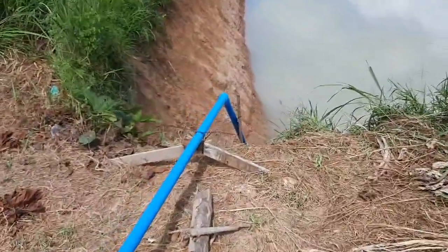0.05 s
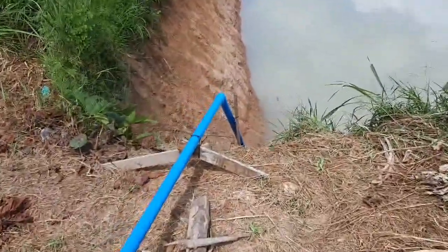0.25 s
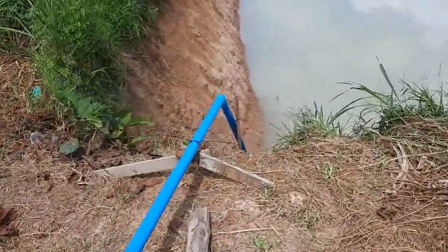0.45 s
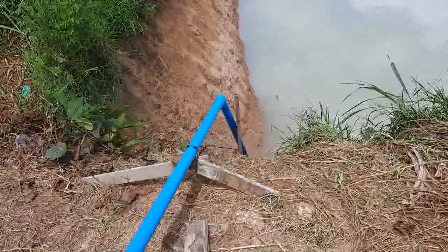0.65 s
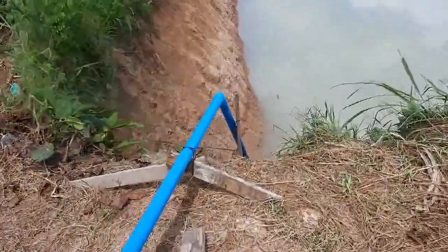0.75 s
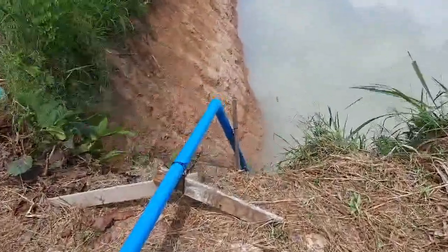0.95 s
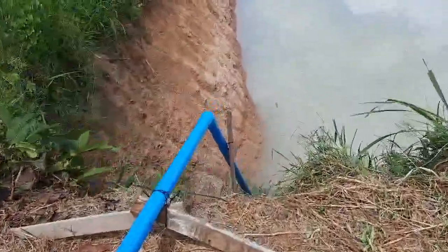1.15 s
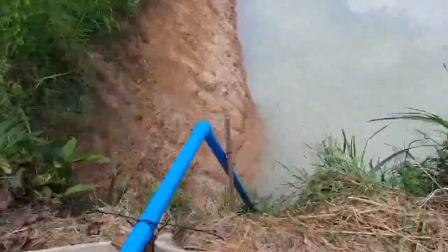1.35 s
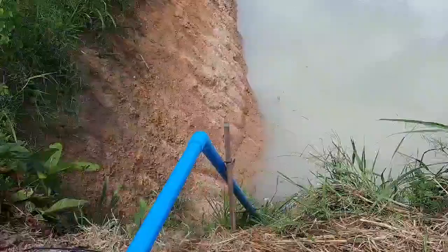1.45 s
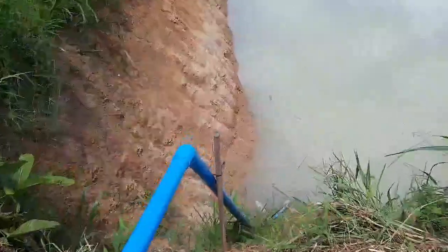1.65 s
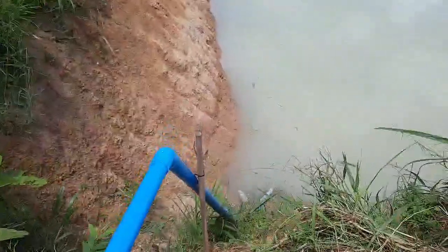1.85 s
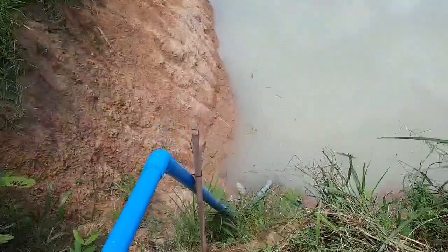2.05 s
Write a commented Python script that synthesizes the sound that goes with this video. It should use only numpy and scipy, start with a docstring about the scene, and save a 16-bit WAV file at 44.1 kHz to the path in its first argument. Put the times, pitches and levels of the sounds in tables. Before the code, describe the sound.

Uneven gusts of wind buffet the microphone outdoors on a pond bank, easing near the end. Underneath, a faint motor whine switches off and coasts down, with light crunching steps and small snaps in dry straw.

```python
"""Wind gusts buffet the two microphone ports of a hand-held camera on a pond bank:
turbulence rumbles at each port and single strong eddies slap it. A small motor whines,
is switched off and coasts down. Feet shift and crunch on dry straw, a few stalks snap,
and an insect pulses faintly in the grass over a low outdoor hiss."""
import sys
import numpy as np
from scipy import signal
from scipy.fft import rfft, irfft, next_fast_len
from scipy.io import wavfile
from scipy.ndimage import uniform_filter1d, map_coordinates

SR = 44100
rng = np.random.default_rng(int(sys.argv[2]) if len(sys.argv) > 2 else 0)


def wrap_up_sound(samples):
    """Save the sound to the file named by the first command line argument, as 16-bit audio."""
    columns = np.atleast_2d(samples).T
    # keep every value between -1 and 1, then stretch to whole-number steps
    tamed = np.clip(columns, -1, 1)
    steps = np.round(tamed * 32767).astype(np.int16)
    wavfile.write(sys.argv[1], SR, steps)


N = 92610

# gust envelope per port: time_s, level_db
LEFT_GUSTS = [(0, -45), (.2, -44), (.279, -40), (.324, -35), (.39, -32.5), (.444, -45), (.574, -39),
              (.644, -41), (.758, -28), (.803, -44), (.888, -33), (.918, -47), (1.018, -39.5), (1.063, -45),
              (1.083, -35), (1.152, -49), (1.25, -45.5), (1.377, -38.5), (1.44, -40.5), (1.485, -34.5),
              (1.6, -25), (1.641, -44.5), (1.716, -33.5), (1.745, -70), (1.79, -50.5), (1.826, -40),
              (1.86, -45.5), (1.911, -45), (1.966, -79), (2.095, -72)]
RIGHT_GUSTS = [(0, -61), (.07, -51.5), (0.113, -35.5), (.15, -40.5), (0.235, -38.5), (0.328, -37.5),
               (0.363, -24), (0.455, -31.5), (.5, -26.5), (.61, -28), (.654, -35.5), (0.791, -30),
               (.823, -24), (.95, -19.5), (0.99, -24.5), (1.04, -19), (1.07, -30), (1.187, -43.5),
               (1.213, -29.5), (1.288, -33), (1.335, -22), (1.39, -27.5), (1.447, -25), (1.497, -27),
               (1.593, -24), (1.63, -41), (1.663, -35), (1.691, -46), (1.78, -52), (1.891, -50.5),
               (2.095, -75)]
# port turbulence: freq_hz, gain_db
BUFFET_SPECTRUM = [(20, -41), (38, -10.5), (60, 0.5), (85, 2), (150, -4), (230, -15), (305, -8.5),
                   (400, -19.5), (550, -33.5), (900, -55.5), (2500, -65.5)]
# small-eddy trim: left_db, right_db
SMALL_EDDY_TRIM = [-3.5, 1.5]
# strong eddies: start_s, level_db, start_pitch_hz, rise_cycles, port (0 left, 1 right)
SLAPS = [(0.231, -25, 84.4, 1.15, 1), (0.35, -20.5, 369, 3.24, 1), (.363, -13.5, 148, 0.61, 1),
         (.379, -12, 133, 0.78, 1), (.478, -15.5, 130, 0.57, 1), (.506, -22, 256, 1.1, 1),
         (.571, -17.5, 100, 1.06, 1), (.6, -18.5, 105, 1, 1), (.812, -17.5, 86, 1.13, 1),
         (.845, -12, 131, 0.9, 1), (.882, -11.5, 100, 0.79, 1), (.920, -7, 117, 0.69, 1),
         (.957, -15, 199, 1.8, 1), (1.012, -19.5, 108, 0.7, 0), (1.028, -19, 279, 2.27, 1),
         (1.082, -22, 90, 0.49, 0), (1.309, -16.5, 176, 0.89, 1), (1.332, -12.5, 203, 2.03, 1),
         (1.483, -12, 126, 0.8, 1), (1.491, -14.5, 120, 0.62, 0), (1.516, -13, 130, 0.56, 0),
         (1.54, -14.5, 220, 1.04, 1), (1.575, -16, 143, 0.77, 0), (1.584, -19, 280, 1.16, 1),
         (1.6056, -6.5, 210, 0.65, 0), (1.648, -23, 129, 1.1, 1), (1.815, -31, 131, 0.96, 0),
         (1.88, -33.5, 84, 1.16, 0)]

# motor tones at full speed: shaft_multiple, level_db
WHINE_ORDERS = [(10, -55.5), (12, -39.5), (20, -61), (24, -69), (25, -59.5)]
HUM_ORDERS = [(4.88, -60.5), (5.44, -64), (8.32, -61)]
# housing ring, air through the motor: freq_hz, gain_db
HOUSING_SPECTRUM = [(1200, -26), (1600, -16), (1740, 2), (1950, -2.5), (2150, -3), (2500, -31)]
AIR_SPECTRUM = [(100, 8), (220, -38), (420, -4.5), (700, 0), (1150, -6), (1500, 2), (2100, 5.5), (2650, -1),
                (3400, 1), (4400, -1.5), (5100, -3.5), (5900, -8.5), (8000, -11.5), (9500, -16.5),
                (12500, -13), (16000, -21.5)]
# air noise arriving straight from the motor: freq_hz, power_share
AIR_DIRECT_SHARE = [(1400, 0.64), (2000, 0.99), (2650, 0.95), (3200, 0.64), (4400, .62), (12000, .32)]
# motor delay between ports: freq_hz, right_lag_ms
MOTOR_LAG = [(700, 0.28), (1500, 0.14), (2000, 0.17), (2600, 0.2), (3800, .24), (8000, 0.248)]
# motor balance: freq_hz, left_minus_right_db
MOTOR_PAN = [(700, 1), (1100, 9), (2000, -3), (2800, 0), (5200, -5.5), (8000, 1)]

# footsteps: start_s, level_db, attack_s, hold_s, t60_s, thud_offset_db
STEPS = [(.03, -51, 0.086, 0.013, 1, -32), (.47, -50, 0.039, 0.024, 2.36, 3.5),
         (.73, -49, 0.067, 0, .5, -3.5), (0.808, -42, 0.0033, 0.0024, 0.42, 4),
         (0.913, -58.5, 0.056, .01, 0.53, 8.5), (1.089, -48.5, 0.002, 0.0095, 0.38, -1),
         (1.241, -42, 0.025, 0.014, 0.3351, 2), (1.422, -61.5, .005, 0.19, 0.05, 6.5),
         (1.659, -54.5, 0.016, 0.057, 0.33, -7), (1.789, -64, 0.02, 0.062, 0.4, -14)]
# crushed straw, scuffed soil: freq_hz, gain_db
STRAW_SPECTRUM = [(300, -36), (1200, -4.5), (2300, 5), (3500, -2), (5500, -0.5), (7000, 1), (9000, -3.5),
                  (10500, -4.5), (12000, 1.5), (14500, 0), (16000, -0.5)]
SOIL_SPECTRUM = [(150, -7), (400, 4.5), (700, 0), (1300, -7), (2500, -12.5), (6000, -37)]
# breaking stalks: start_s, level_db, ring_hz, ring_offset_db
SNAPS = [(0.809, -34, 2400, -22), (.814, -44.5, 738, 6), (0.9684, -51.5, 1500, 11.5),
         (1.091, -39.5, 2700, -7), (1.1821, -41.5, 5000, -37), (1.264, -49, 2200, -10),
         (1.359, -54.5, 2800, 6.5), (1.4302, -40, 9000, -12.5), (1.807, -61, 2315, 6),
         (2.049, -63, 2400, 2.5)]
# insect rasp, outdoor hiss: freq_hz, gain_db
RASP_SPECTRUM = [(6800, -34), (7400, -5), (7750, -1), (8200, -43)]
FIELD_SPECTRUM = [(60, 16), (180, -10), (320, -3), (600, 2), (1300, -27), (2300, 6.5), (3500, -2),
                  (7000, 2), (8500, -6), (14000, -6), (16000, -28)]


def amp(db):
    return 10 ** (np.asarray(db) / 20)


def unit_rms(x):
    return x / np.sqrt(np.mean(x ** 2) + 1e-20)


def time_s():
    return np.arange(N) / SR


def lookup(table, hz):
    """Interpolate (freq_hz, value) rows on a log frequency axis."""
    freq_hz, value = np.transpose(table)
    return np.interp(np.log(hz + 1), np.log(freq_hz + 1), value)


def filtered(x, response):
    """Apply a complex frequency response."""
    size = next_fast_len(N + SR // 2)
    return irfft(rfft(x, size) * response(np.fft.rfftfreq(size, 1 / SR)), size)[..., :N]


def coloured(x, spectrum):
    """Shape x by a spectrum; rms 1."""
    return unit_rms(filtered(x, lambda hz: amp(lookup(spectrum, hz))))


def noise(spectrum, coherence=0):
    """Shaped stereo noise; rms 1."""
    white = rng.standard_normal((3, N))
    return coloured(np.sqrt(1 - coherence) * white[:2] + np.sqrt(coherence) * white[2], spectrum)


def wobble(rate_hz):
    """Smooth random curve through Gaussian knots."""
    knots = rng.standard_normal(int(N * rate_hz / SR) + 4)
    return map_coordinates(knots, [np.arange(N) * rate_hz / SR])


def burst(start_s, attack_s, t60_s, hold_s=0):
    """Linear rise, hold, exponential decay."""
    age_s = time_s() - start_s
    return np.clip(age_s / attack_s, 0, 1) * amp(-60 * np.maximum(age_s - attack_s - hold_s, 0) / t60_s)


def wind_buffet(split_hz=197, strong_gust_db=-27.5, eddy_db_per_db=0.31, flap_hz=38, flutter_hz=90):
    """Each port has its own turbulence; stronger gusts shed more small, higher-pitched eddies."""
    gust_db = np.array([np.interp(time_s(), *np.transpose(port)) for port in (LEFT_GUSTS, RIGHT_GUSTS)])
    swirl = noise(BUFFET_SPECTRUM)
    swirl /= np.sqrt(np.abs(uniform_filter1d(swirl ** 2, size=1300)) + 0.02)  # flatten the envelope
    large_eddies = filtered(swirl, lambda hz: 1 / (1 + (hz / split_hz) ** 6))
    # flap: the flow catches and leaves each port
    flap, flutter = (np.array([wobble(hz), wobble(hz)]) for hz in (flap_hz, flutter_hz))
    flap -= uniform_filter1d(flap, size=1800)
    flap, flutter = (1.35 * np.tanh(swing / 1.35) for swing in (flap, flutter))  # soft limit
    trim_db = np.array(SMALL_EDDY_TRIM)[:, None]
    small_db = eddy_db_per_db * (gust_db - strong_gust_db) + 2.96 * flutter + trim_db
    small_eddies = (swirl - large_eddies) * amp(small_db)
    return amp(gust_db + 2.5 * flap) * (large_eddies + small_eddies)


def eddy_slaps(half_pitch_rises=3.94):
    """A strong eddy hits one port: a sudden pressure swing that slows as it dies."""
    ports = np.zeros((2, N))
    for start_s, level_db, pitch_hz, rise_cycles, port in SLAPS:
        age_rises = np.maximum(time_s() - start_s, 0) * pitch_hz / rise_cycles
        cycles = rise_cycles * half_pitch_rises * np.log1p(age_rises / half_pitch_rises)
        envelope = (age_rises * np.exp(1 - age_rises)) ** 2
        ports[port] += amp(level_db) * envelope * np.sin(2 * np.pi * cycles)
    return ports


def shaft_tones(orders, turns):
    """Tones at multiples of the shaft rate, each flickering in level."""
    return sum(amp(level_db + wobble(45.1)) * np.sqrt(2) * np.sin(2 * np.pi * multiple * turns)
               for multiple, level_db in orders)


def motor(whine_hz=2087, blades=12, off_s=0.305, coast_per_s=0.63, fade_s=0.27):
    """Tones sink after switch-off; whine and housing ring fade first, then hum and rushing air."""
    coast_s = np.maximum(time_s() - off_s, 0)
    slowing = coast_per_s * coast_s  # loss of log speed
    shaft_hz = whine_hz / blades * np.exp(-slowing) * (1 + 0.0025 * wobble(58.8))
    turns = np.cumsum(shaft_hz) / SR
    fade = 1 - np.exp(-(coast_s / fade_s) ** 4)
    tones = shaft_tones(WHINE_ORDERS, turns)
    housing = amp(-46.5) * noise(HOUSING_SPECTRUM)[0]
    whine = amp(-25.5 * slowing - 19 * fade) * (tones + housing)
    hum = amp(-33 * slowing) * shaft_tones(HUM_ORDERS, turns)
    air_gain = amp(-42.5 - 26.5 * slowing + 0.79 * wobble(39.24))
    direct_air = filtered(noise(AIR_SPECTRUM)[0], lambda hz: np.sqrt(lookup(AIR_DIRECT_SHARE, hz)))
    diffuse_air = filtered(noise(AIR_SPECTRUM), lambda hz: np.sqrt(1 - lookup(AIR_DIRECT_SHARE, hz)))
    return motor_at_ports(whine + hum + air_gain * direct_air, air_gain * diffuse_air)


def motor_at_ports(direct, diffuse):
    """Direct sound reaches the right port later; the balance varies with frequency."""
    side = np.array([[0.5], [-0.5]])
    arrived = filtered(direct, lambda hz: np.exp(2j * np.pi * hz * side * lookup(MOTOR_LAG, hz) / 1000))
    return filtered(arrived + diffuse, lambda hz: amp(side * lookup(MOTOR_PAN, hz)))


def footsteps(cracks_per_s=900, crack_spread_db=3.5, crackle_db=-6, soil_db=-3.5):
    """Each step crushes straw into a rustle of tiny cracks and scuffs the soil below."""
    crush, press = np.zeros((2, N))
    for start_s, level_db, attack_s, hold_s, t60_s, thud_offset_db in STEPS:
        envelope = amp(level_db) * burst(start_s, attack_s, t60_s, hold_s)
        crush += envelope
        press += amp(thud_offset_db) * envelope
    sizes = amp(crack_spread_db * np.minimum(rng.exponential(size=N), 4))
    cracks = (rng.random(N) < cracks_per_s / SR) * sizes * rng.standard_normal((2, N))
    rustle = noise(STRAW_SPECTRUM, coherence=0.14)
    straw = unit_rms(rustle + amp(crackle_db) * coloured(cracks, STRAW_SPECTRUM))
    return crush * straw + amp(soil_db) * press * noise(SOIL_SPECTRUM, coherence=0.75)


def stalk_snaps():
    """Dry stalks break: a crack and a very short ring."""
    crack_envelope, ring = np.zeros((2, N))
    for start_s, level_db, ring_hz, ring_offset_db in SNAPS:
        crack_envelope += amp(level_db) * burst(start_s, attack_s=0.00071, t60_s=0.0077)
        tone = np.sin(2 * np.pi * ring_hz * time_s() + wobble(700))
        ring += amp(level_db + ring_offset_db) * burst(start_s, attack_s=0.00063, t60_s=0.027) * tone
    return crack_envelope * noise(STRAW_SPECTRUM, coherence=0.21) + ring


def insect(pulses_per_s=33, pulse_s=0.021, top_hz=7950, drop_hz=449, level_db=-68, rasp_offset_db=-8.5):
    """A fast train of short pulses, each falling in pitch, over a continuous rasp."""
    jittered_s = time_s() - 0.0112 + 0.002 * wobble(24)
    progress = np.minimum(jittered_s % (1 / pulses_per_s) / pulse_s, 1)
    pitch_hz = top_hz - drop_hz * progress + 130 * wobble(600)
    pulses = np.sin(np.pi * progress) * np.sin(2 * np.pi * np.cumsum(pitch_hz) / SR)
    rasp = amp(rasp_offset_db) * noise(RASP_SPECTRUM)
    flicker_db = 1.6 * np.array([wobble(40), wobble(88)])
    return (pulses + rasp) * amp(level_db + flicker_db)


def field_hiss(level_db=-66):
    """Steady outdoor background, slightly louder on the right."""
    balance_db = np.array([[-1.5], [1.5]])
    return amp(level_db + balance_db) * noise(FIELD_SPECTRUM, coherence=0.05)


def scene():
    background = field_hiss()
    return wind_buffet() + eddy_slaps() + motor() + footsteps() + stalk_snaps() + insect() + background


def record(dry, low_cut_hz=41.4, band_limit_hz=15850):
    """Microphone bass roll-off and band limit."""
    low_cut = signal.butter(3, low_cut_hz, "highpass", fs=SR, output="sos")
    return filtered(signal.sosfilt(low_cut, dry), lambda hz: hz < band_limit_hz)


dry = scene()
out = record(dry)
wrap_up_sound(out)
```